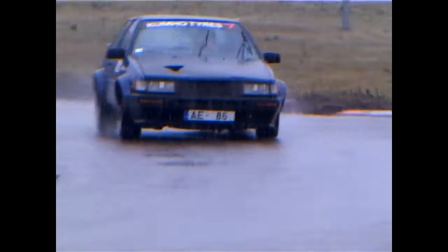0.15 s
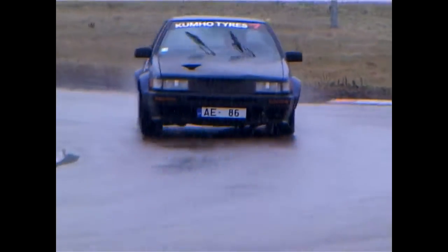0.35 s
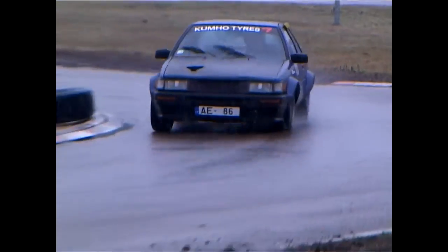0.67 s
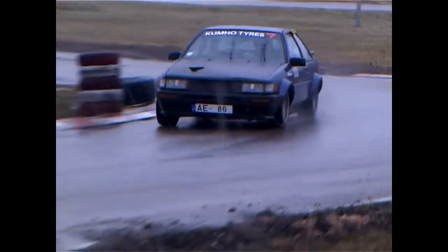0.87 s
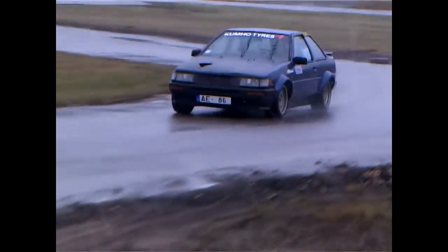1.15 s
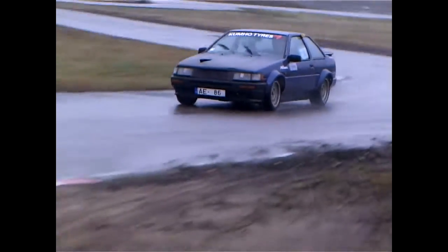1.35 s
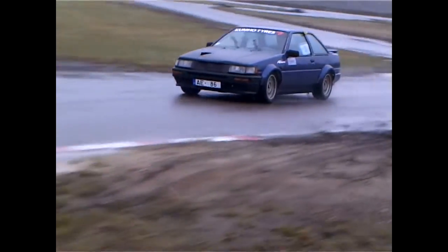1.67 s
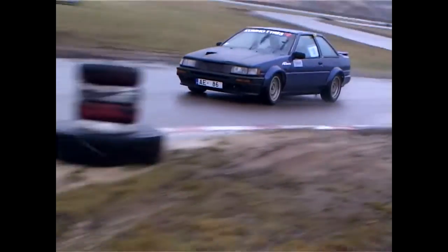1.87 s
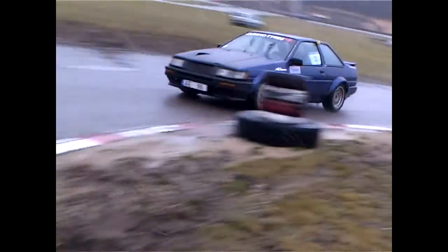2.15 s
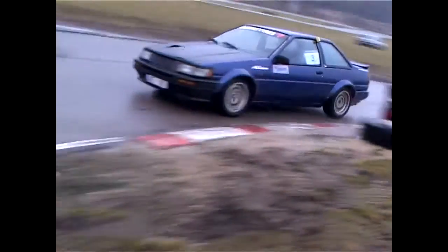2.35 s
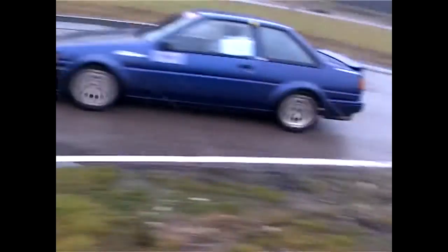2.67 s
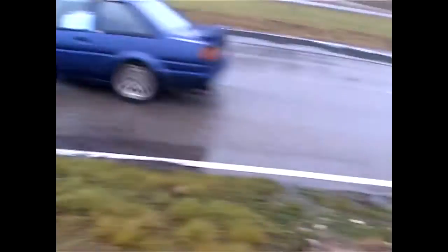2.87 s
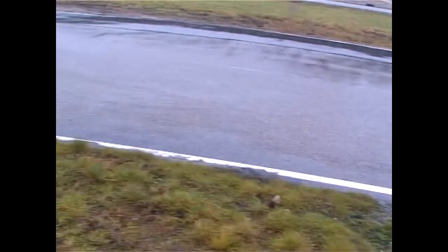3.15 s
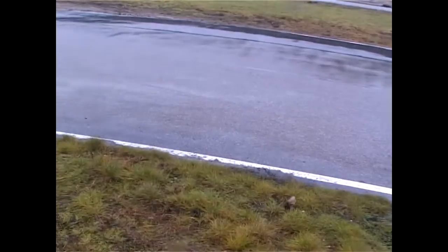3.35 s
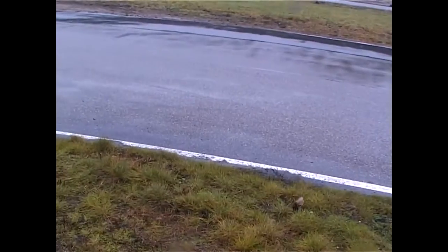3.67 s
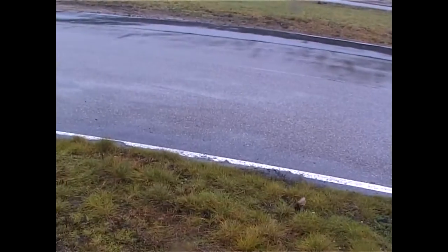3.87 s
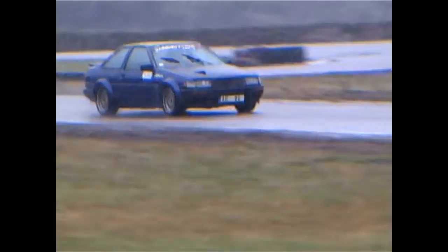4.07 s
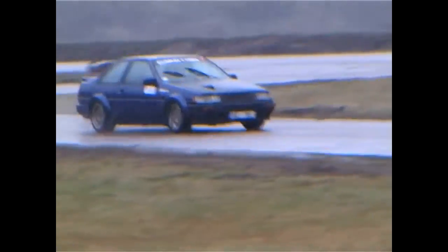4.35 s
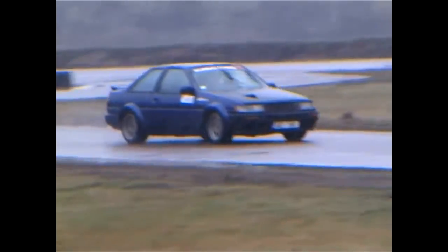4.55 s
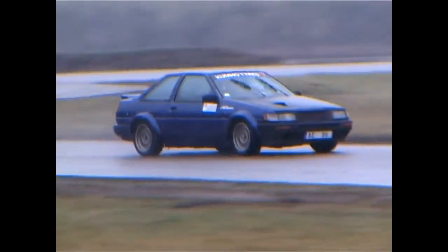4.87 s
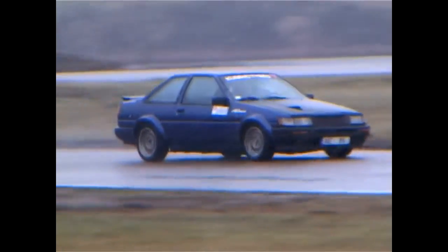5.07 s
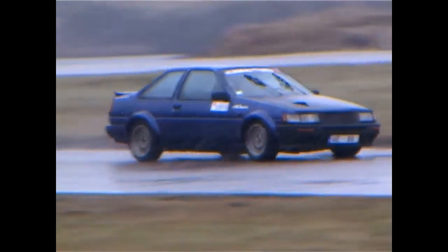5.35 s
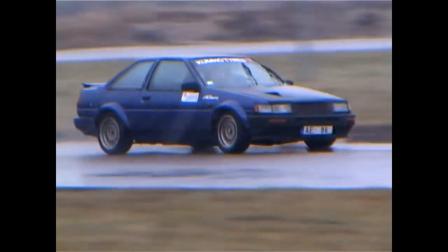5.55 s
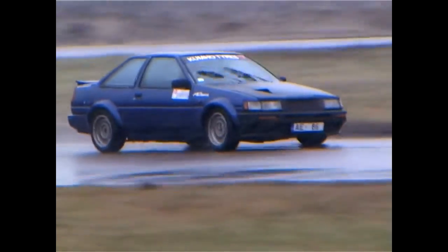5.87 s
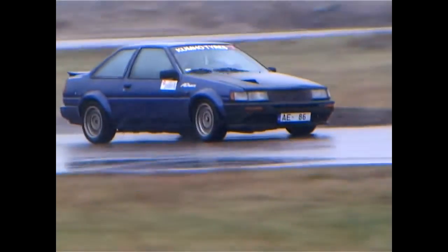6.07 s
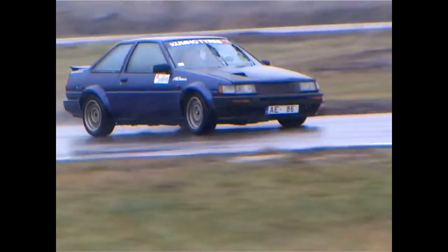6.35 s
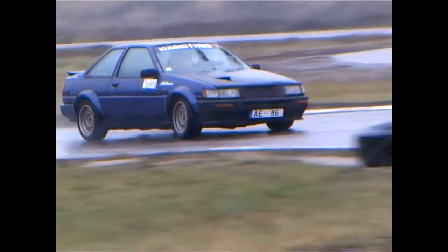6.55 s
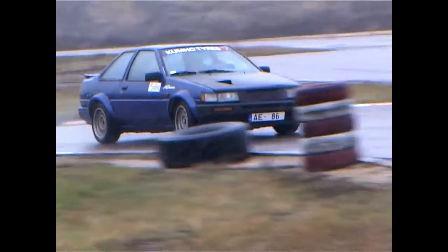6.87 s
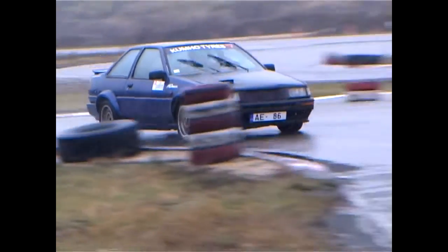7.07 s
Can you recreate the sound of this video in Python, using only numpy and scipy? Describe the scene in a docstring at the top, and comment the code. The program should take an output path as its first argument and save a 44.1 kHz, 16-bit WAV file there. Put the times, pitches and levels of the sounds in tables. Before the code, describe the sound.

Outdoors on a wet track, a car engine holds wavering revs, swelling to a close, barking growl over wide tyre roar and water spray. A brief metallic rattle follows, then the sound cuts out for an instant. It returns with the car more distant, its exhaust popping several times before the revs sag and pick up. Occasional drops land near the microphone, with far engines and a very faint electronic whine underneath.

```python
"""A four-cylinder car slides through two wet corners of a race track, with a short silence between them.
Its exhaust pulses and rushing gas boom, growl and bark. Loose exhaust metal rattles as it leaves the
first corner, and it backfires in the second, farther one. Tyres roar on the wet road and throw spray,
a few drops hit close by, and other engines drone further off. Under it all, the electronics of a
stereo microphone faintly whine and hiss."""
import sys
import numpy as np
from scipy import signal
from scipy.fft import rfft, irfft, next_fast_len
from scipy.io import wavfile
from scipy.ndimage import uniform_filter1d, map_coordinates

SR = 44100
rng = np.random.default_rng(int(sys.argv[2]) if len(sys.argv) > 2 else 0)


def wav_out(sig):
    """Save sig, one row per channel (or a flat mono array), as 16-bit PCM at SR to the path in sys.argv[1]."""
    wavfile.write(sys.argv[1], SR, np.round(np.clip(np.atleast_2d(sig).T, -1, 1) * 32767).astype(np.int16))


N = 317520
TIME = np.arange(N) / SR
SECOND_CORNER_S, SILENCE_START_S, SILENCE_END_S = 4.27, 4.1935, 4.3525

# How alike left and right are in rushing noise: frequency_hz, likeness (1 = the same)
STEREO_LIKENESS = [(30, 0.99), (1000, 0.95), (1500, .8), (2200, 0.96), (3300, 0.36), (5500, 0.96),
                   (8000, 0.37), (16000, .1)]
# How far each side's phase wanders, opposite to the other: frequency_hz, twist_radians
STEREO_TWIST = [(900, 0), (1300, 0), (1900, 0.94), (3300, 0.64), (5500, 0.61), (9000, 0.59)]
# Thin tones of the electronics: pitch_hz, level_db
WHINE_TONES = [(15127, -92), (15375, -90), (15622, -97.5)]
# Tone colour of each noise: frequency_hz, relative_db
HISS_COLOUR = [(6000, -29.5), (10000, 2.5), (16000, -1.5)]  # electronics
RUMBLE_COLOUR = [(15, -29), (30, -20.5), (50, -4.5), (80, 3.5), (130, 8), (200, -1), (350, -13),
                 (600, -55.5)]  # road
NEAR_ROAR_COLOUR = [(500, 1.5), (900, 9), (1250, 7.5), (1550, -4), (1900, 0.5), (2250, 1.5), (2550, -6),
                    (2850, -2.5), (3200, -29.5), (4000, -50)]  # tyres, with a dip from the ground echo
FAR_ROAR_COLOUR = [(500, -26), (900, 7.5), (1250, 4.5), (1600, -0.5), (1900, 0), (2250, 0), (2550, -5.5),
                   (2850, -8.5), (3200, -21.5), (4000, -42)]  # tyres in the second corner, without that dip
SPRAY_COLOUR = [(2500, -14.5), (3200, 2), (3800, 2), (4500, -1), (5200, -2), (5900, 1), (6600, -4),
                (7600, -15), (9000, -33)]  # thrown water
MIST_COLOUR = [(6000, -17), (7400, 0), (8600, -1), (10000, -6.5), (11500, -14), (13000, -23.5),
               (16000, -41)]  # finer water
THUMP_COLOUR = [(180, -26), (300, -5.5), (450, 2), (600, 0.5), (800, 2.5), (950, -8), (1300, -17.5),
                (2500, -41.5)]  # the pipe in a backfire
CRACK_COLOUR = [(300, -23.5), (1000, 3), (3000, -12), (7000, -16.5), (8500, -38), (14000, -52.5)]  # the sharp edge of a backfire
RATTLE_COLOUR = [(3200, -50), (4300, -4), (5200, 6), (6000, 1.5), (7500, 0), (8600, -9), (10000, -9.5),
                 (11500, -17), (14000, -26), (16000, -43.5)]  # loose metal
GROWL_COLOUR = [(130, -53), (185, 4), (300, 2), (440, -4.5), (520, -6), (620, -61)]  # low exhaust gas noise
BARK_COLOUR = [(400, -29), (530, 1.5), (620, 1), (745, 8.5), (860, 4.5), (1050, -7.5), (1250, -8.5),
               (1500, -21.5), (2500, -92)]  # higher exhaust gas noise
# Distant engines, one list each: time_s, firing_rate_hz, level_db
DISTANT_ENGINES = [
    [(0.02, 93.6, -35), (0.14, 87.5, -28), (0.26, 87.2, -40), (0.38, 83, -32.5), (0.5, 82.5, -35),
     (0.62, 91.4, -36), (0.74, 91.5, -33), (0.86, 98.36, -39), (0.98, 98.5, -32), (1.1, 112.8, -38),
     (1.22, 128, -37), (1.34, 135, -37)],
    [(2.06, 146.9, -17), (2.1, 158, -26), (2.14, 163, -18.5), (2.18, 165.8, -18), (2.22, 168.8, -17.5),
     (2.26, 171.9, -28), (2.3, 162.1, -28), (2.34, 167.3, -25)],
    [(4.38, 119.5, -28), (4.53, 116.5, -26.5), (4.68, 113.9, -29), (4.83, 109.3, -29.5),
     (4.98, 105.6, -32.5), (5.13, 104.7, -26), (5.28, 99.74, -32.5), (5.43, 97.95, -31.5),
     (5.58, 95.1, -43), (5.73, 91.4, -33), (5.88, 89.3, -45), (6.03, 87.16, -49), (6.18, 84.44, -27),
     (6.33, 82.26, -38), (6.48, 78.8, -39), (6.63, 76.9, -36), (6.78, 77.2, -37), (6.93, 77.9, -35),
     (7.08, 79.9, -32)],
    [(4.38, 159.1, -41), (4.5, 163.1, -27), (4.62, 164.3, -30), (4.74, 170.9, -43), (4.86, 171.9, -30),
     (4.98, 178.3, -47), (5.1, 179.3, -51), (5.22, 179.4, -34), (5.34, 180.1, -46), (5.46, 180.9, -32),
     (5.58, 186.7, -40), (5.7, 187.6, -36.5), (5.82, 178.8, -27.5), (5.94, 175.3, -29.5),
     (6.06, 154.3, -27.5)],
]
# Their tones: multiple of the firing rate, relative_db
DISTANT_TONES = [(1, -0.5), (1.5, -17.5), (2, -21.5), (3, -21.5)]
# How each wet road noise swells, before its fixed boost: time_s, rumble_db, roar_db, spray_db, mist_db
ROAD_LEVELS = [(0.0, -32, -49, -64.5, -67.5), (0.28, -37.5, -48, -65.5, -70),
               (0.42, -37.5, -48, -65.5, -66.5), (0.53, -39.5, -48.5, -63.5, -67),
               (0.69, -37.5, -47, -61, -65), (0.84, -38, -45, -60, -63), (1.01, -38, -45, -59, -63),
               (1.2, -40, -45, -58, -60.5), (1.32, -40, -43, -58, -60.5), (1.53, -42.5, -44, -61, -61),
               (1.69, -38.5, -44.5, -60, -61.5), (1.96, -37, -41.5, -59.5, -63.5),
               (2.09, -33.5, -40, -58.5, -62.5), (2.28, -34.5, -40, -63, -68.5),
               (2.65, -46, -41.5, -58, -60), (2.89, -42.5, -44.5, -60.5, -61.5),
               (3.01, -41.5, -44, -60.5, -62), (3.2, -45.5, -48, -62, -62), (3.32, -46.5, -52, -66, -64.5),
               (3.5, -43, -54, -67.5, -72.5), (3.6, -41.5, -53, -62, -70), (3.752, -40.5, -53, -65, -71),
               (3.892, -43, -55.5, -64, -74), (4.0, -38, -56.5, -64, -72), (4.55, -40.5, -46.5, -68.5, -73),
               (4.72, -37, -47, -68.5, -73), (4.88, -37.5, -47.5, -69.5, -74),
               (5.12, -35.5, -45.5, -66, -76), (5.2, -35, -46.5, -65.5, -74.5),
               (5.39, -37.5, -45, -69, -76), (5.65, -37.5, -43, -64.5, -72), (5.86, -37.5, -42.5, -64, -69),
               (6.04, -40, -45.5, -64.5, -69), (6.15, -39, -48, -63.5, -68.5),
               (6.32, -36.5, -46, -64, -69.5), (6.5, -33.5, -47.5, -64.5, -71),
               (6.72, -39, -48, -62.5, -67.5), (6.94, -40, -46.5, -64, -68.5),
               (7.17, -33, -47.5, -62.5, -68.5)]
# Drops landing near the microphone: start_s, peak_db, pitch_hz
DROP_HITS = [(.433, -45, 10200), (0.6319, -27.5, 8800), (1.358, -16.5, 2480), (1.358, -44.5, 8330),
             (4.405, -41, 6920), (5.719, -35, 5040), (5.83, -36, 5850), (6.777, -33.5, 6130),
             (6.892, -47.5, 10000)]
# Backfires, with relative levels (a fade is the time to fall by 60 dB):
# start_s, blast_db, rise_s, thump_db, thump_fade_s, ring_db, ring_hz, crack_db
BACKFIRES = [(4.37, -19, .0004, -19, 0.061, -18, 320.3, -31),
             (4.5121, -10.5, 0.00032, -20, .06, -21, 780, -36),
             (4.634, -10.5, 0.0003, -21, 0.067, -18.5, 783.7, -36),
             (5.224, -8.5, .00035, -16.5, .05, -34, 451.2, -14),
             (5.5365, -12, 0.00042, -26, .08, -16, 624, -35)]
# Strength of the exhaust rattle: time_s, relative_db
RATTLE_LEVELS = [(3.5, -78), (3.506, -73), (3.582, -47.5), (3.724, -44.5), (3.726, -49), (3.782, -46),
                 (3.81, -63), (3.83, -60.5), (3.835, -56), (3.845, -48.5), (3.881, -47.5), (3.9, -66),
                 (3.91, -60.5), (3.952, -53), (3.958, -62.5), (4.012, -54), (4.022, -66), (4.064, -54),
                 (4.19, -63.5)]
# The car's engine: time_s, firing_rate_hz, boom_db, growl_db, bark_db, cylinder unevenness (0 to 1)
ENGINE_RUN = [(0.02, 138.7, -31.5, -35, -43, 0.4), (0.12, 136.3, -30, -44, -41.5, 0.4),
              (0.22, 135.9, -29, -37, -46, 0.3), (0.32, 132.1, -25, -41.5, -41, 0.4),
              (0.42, 133.3, -30, -50, -37.5, 0.2), (0.46, 136.2, -29, -31.5, -36, 0.4),
              (0.52, 139.6, -25, -36, -35, 0), (0.62, 136.2, -24.5, -28.5, -34, 0),
              (0.67, 133.8, -23, -29.5, -33.5, 0.4), (0.72, 137.3, -23.5, -26, -29, 0.1),
              (0.82, 142.4, -23, -24.5, -30.5, 0.4), (0.86, 144.4, -19.5, -25, -29.5, 0.3),
              (0.92, 140.2, -22.5, -20, -25, 0), (1.02, 140.5, -22, -21.5, -26.5, 0.3),
              (1.12, 144.1, -23, -19, -26, 0), (1.22, 143.6, -20.5, -18, -23, 0.4),
              (1.32, 146.8, -18, -17.5, -21.5, 0.2), (1.42, 146.8, -18, -19, -24, 0.4),
              (1.52, 148.4, -17.5, -20, -23, 0.4), (1.62, 150.2, -16.5, -21, -24, 0.4),
              (1.72, 150.9, -19, -23, -24.5, 0.4), (1.82, 152.7, -18, -26, -25, 0),
              (1.92, 151.5, -20, -24.5, -25, 0), (1.97, 152.7, -21, -26, -29, 0.4),
              (2.02, 145.7, -19.5, -27.5, -27, 0.4), (2.06, 142.7, -20, -26, -27, 0.4),
              (2.12, 147, -20, -27, -29.5, 0), (2.22, 151.3, -28, -28.5, -31.5, 0.4),
              (2.32, 152.1, -19, -22.5, -26, 0), (2.42, 148.9, -15.5, -23.5, -30.5, 0),
              (2.52, 149.2, -15.5, -25, -28, 0), (2.62, 152.1, -16, -24.5, -25, 0.1),
              (2.72, 150.7, -16.5, -25, -23, 0.4), (2.82, 152.2, -15.5, -22.5, -22.5, 0.2),
              (2.92, 149.2, -15.5, -23, -24.5, 0.1), (3.02, 147.8, -15.5, -24.5, -21, 0.4),
              (3.12, 147.1, -16, -25, -23, 0.4), (3.22, 145, -17.5, -27.5, -22, 0.2),
              (3.32, 146.3, -20.5, -26, -23.5, 0.1), (3.38, 145.1, -18.5, -26, -24.5, 0.3),
              (3.42, 138.8, -25, -39, -36, 0.4), (3.46, 134.7, -25.5, -33, -34, 0.1),
              (3.52, 141.2, -19, -30, -33.5, 0), (3.57, 145.4, -19.5, -31.5, -26.5, 0),
              (3.62, 143.2, -17.5, -31, -28.5, 0.2), (3.67, 140.2, -19.5, -31, -28.5, 0),
              (3.72, 140.6, -18.5, -30.5, -30, 0.1), (3.78, 141, -19.5, -33.5, -28, 0.4),
              (3.82, 141.4, -21, -33.5, -35, 0.4), (3.92, 138.4, -19.5, -32.5, -32, 0.4),
              (4.02, 136.3, -23, -35, -32.5, 0.2), (4.12, 135.8, -20, -32, -34.5, 0.4),
              (4.17, 135.2, -23.5, -35, -34.5, 0.3), (4.38, 141.4, -23, -31.5, -41, 0.4),
              (4.48, 141.5, -32, -29.5, -35, 0), (4.58, 143.9, -26, -31.5, -40.5, 0.4),
              (4.68, 147.5, -29, -33.5, -42, 0.4), (4.78, 148.3, -28.5, -32, -39, 0.4),
              (4.88, 150.2, -28.5, -30, -40.5, 0.3), (4.98, 150.4, -28, -28.5, -37, 0.3),
              (5.08, 155.8, -31.5, -27, -34, 0.1), (5.18, 155.2, -30, -27, -38, 0),
              (5.22, 156.5, -28, -24, -33, 0.3), (5.25, 157, -34, -41, -43, 0),
              (5.38, 155.4, -31, -36.5, -39.5, 0.3), (5.48, 153, -30, -43.5, -46, 0),
              (5.58, 151.8, -27, -33, -33.5, 0.4), (5.68, 150.6, -25.5, -39.5, -39, 0.4),
              (5.78, 149, -26, -38, -34.5, 0.4), (5.88, 147.2, -28.5, -32.5, -38, 0.4),
              (5.98, 142.4, -38, -36.5, -37.5, 0.4), (6.08, 132, -26, -35, -36, 0.4),
              (6.18, 123.6, -28.5, -36.5, -41.5, 0.2), (6.28, 132.8, -21.5, -36, -41, 0),
              (6.38, 130.5, -25, -36, -42, 0.4), (6.48, 132.7, -19.5, -38, -39, 0.4),
              (6.58, 134.1, -23, -36, -42, 0.3), (6.68, 133.8, -29, -41, -41, 0.3),
              (6.78, 135.8, -22.5, -33.5, -41.5, 0), (6.88, 136.2, -22.5, -37, -42, 0.2),
              (6.98, 139.3, -19, -36, -38.5, 0.4), (7.08, 135.9, -29, -33.5, -40.5, 0),
              (7.18, 139.8, -25, -32, -39.5, 0.3)]
# Gas noise in the exhaust note, high off the throttle and far away: time_s, share (0 to 1)
GAS_SHARE = [(0, .8), (.42, .8), (.55, .45), (1, .3), (1.9, .3), (2.02, .75), (2.3, .6), (2.6, .4),
             (2.8, .25), (3.35, .2), (3.45, .65), (3.56, .25), (3.78, .25), (3.86, .65), (4.4, .7),
             (4.75, .45), (5.2, .4), (5.28, .9), (6, .9), (6.5, .7), (7.2, .55)]
# Which end of the car faces us: time_s, facing (0 = nose, 1 = tail)
CAR_FACING = [(0, 0.18), (1.9, 0.19), (2.5, 0.89), (2.8, 1), (4.2, 0.77), (4.35, 0.23), (5.2, 0.023),
              (6.2, 1), (7.2, 0.72)]
# Exhaust tones from each side: multiple of the crankshaft speed, relative_db
NOSE_TONES = [(0.5, -32), (1, -34), (1.5, -21.5), (2, 0), (2.5, -14), (3, -7), (3.5, -12), (4, -6),
              (4.5, -21), (5, -22.5), (5.5, -27.5), (6, -8.5), (6.5, -26.5), (7, -22.5), (7.5, -12),
              (8, -8.5), (8.5, -19), (9, -10.5), (9.5, -12), (10, -9.5), (10.5, -23.5), (11, -15),
              (11.5, -29.5), (12, -12), (12.5, -28), (13, -17.5), (13.5, -28), (14, -15), (14.5, -25),
              (15, -18.5), (15.5, -32), (16, -41)]
FAR_NOSE_TONES = [(0.5, -32), (1, -24), (1.5, -8), (2, 0), (2.5, -21), (3, -5.5), (3.5, -5), (4, -4.5),
                  (4.5, -12.5), (5, -26), (5.5, -20), (6, -17), (6.5, -23), (7, -22.5), (7.5, -20),
                  (8, -14), (8.5, -10.5), (9, -13), (9.5, -17), (10, -9.5), (10.5, -27), (11, -19),
                  (11.5, -24), (12, -17), (12.5, -34), (13, -34), (13.5, -26), (14, -30), (14.5, -23),
                  (15, -38), (15.5, -39), (16, -44)]  # in the second corner
TAIL_TONES = [(0.5, -35), (1, -26), (1.5, -27), (2, 0), (2.5, -17.5), (3, -12.5), (3.5, -33.5), (4, -10),
              (4.5, -38), (5, -21.5), (5.5, -36), (6, -14.5), (6.5, -38.5), (7, -26.5), (7.5, -34.5),
              (8, -15), (8.5, -22.5), (9, -14.5), (9.5, -34), (10, -8), (10.5, -21), (11, -12), (11.5, -38),
              (12, -15), (12.5, -23.5), (13, -17), (13.5, -36), (14, -24), (14.5, -28.5), (15, -32.5),
              (15.5, -41.5), (16, -31)]


def amp(db):
    """Turn decibels into a gain."""
    return 10 ** (np.asarray(db) / 20)


def unit(x):
    """Scale to an average (rms) level of 1."""
    return x / np.sqrt(np.mean(x ** 2) + 1e-20)


def along(points, hz):
    """Read between a table's rows on a log frequency scale."""
    frequencies, values = np.transpose(points)
    return np.interp(np.log(hz + 1), np.log(frequencies + 1), values)


def curves(rows):
    """One value per sample for each column after the time."""
    times, *columns = np.transpose(rows)
    return [np.interp(TIME, times, column) for column in columns]


def wobble(rate_hz):
    """A smooth curve through rate_hz random points a second."""
    coarse = TIME[::32]
    points = rng.standard_normal(int(N * rate_hz / SR) + 4)
    return np.interp(TIME, coarse, map_coordinates(points, [coarse * rate_hz]))


def filtered(x, response):
    """Multiply each frequency in x by response(hz)."""
    size = next_fast_len(N + SR // 2)
    return irfft(rfft(x, size) * response(np.fft.rfftfreq(size, 1 / SR)), size)[..., :N]


def coloured(x, colour):
    """Give x a tone colour, at an average level of 1."""
    return unit(filtered(x, lambda hz: amp(along(colour, hz))))


def rush(colour, patchy_db, stripes_db=1.47):
    """Patchy stereo noise; echoes off the wet ground shift the phase between left and right."""
    hz, _, noise = signal.stft(rng.standard_normal((2, N)), SR, nperseg=512)

    def patches(bands, frames):
        field = rng.standard_normal(noise.shape[1:])
        return unit(uniform_filter1d(uniform_filter1d(field, bands, 0), frames, 1))

    noise = noise * amp(patchy_db * patches(6, 10) + stripes_db * patches(3, 150))  # quick, and lasting
    spread = np.arccos(np.clip(along(STEREO_LIKENESS, hz), -1, 1))[:, None] / 2
    twist = np.exp(1j * along(STEREO_TWIST, hz)[:, None] * patches(4, 90))
    middle, side = np.cos(spread) * noise[0], np.sin(spread) * noise[1]
    pair = np.array([middle * twist + side, middle / twist - side])
    return coloured(signal.istft(pair, nperseg=512)[1][:, :N], colour)


def electronics():
    """The microphone's circuits add a faint, high whine and hiss."""
    whine = sum(amp(db) * np.sqrt(2) * np.sin(2 * np.pi * hz * TIME) for hz, db in WHINE_TONES)
    return whine + amp(-83) * coloured(rng.standard_normal((2, N)), HISS_COLOUR)


def distant_engines():
    """Each engine's firing makes a wavering note with weak overtones, fading in and out."""
    out = np.zeros(N)
    for rows in DISTANT_ENGINES:
        hz, db = curves(rows)
        fade = np.clip(np.minimum(TIME - rows[0][0], rows[-1][0] - TIME) / 0.083 + 1, 0, 1)
        phase = 2 * np.pi * np.cumsum(hz) / SR + 0.39 * wobble(4.8)
        note = sum(amp(tone_db + 1.4 * wobble(23)) * np.sin(k * phase) for k, tone_db in DISTANT_TONES)
        out += fade * amp(db) * np.sqrt(2) * note
    return out


def wet_road():
    """Tyres rumble, roar and throw up spray and mist; the last three partly swell together."""
    rumble_db, roar_db, spray_db, mist_db = curves(ROAD_LEVELS)
    swell = wobble(9.9)
    rumble = amp(rumble_db + 3.5 + 1.1 * wobble(10)) * rush(RUMBLE_COLOUR, patchy_db=0.5)
    roar_gain = amp(roar_db + 8.5 + .75 * swell + 0.32 * wobble(60))
    near, far = rush(NEAR_ROAR_COLOUR, patchy_db=0.14), rush(FAR_ROAR_COLOUR, patchy_db=1.0)
    roar = roar_gain * np.where(TIME < SECOND_CORNER_S, near, far)
    spray = amp(spray_db + 8.5 + .8 * swell + wobble(90)) * rush(SPRAY_COLOUR, patchy_db=1.24)
    mist = amp(mist_db + 3 + 0.83 * swell + 1.1 * wobble(40)) * rush(MIST_COLOUR, patchy_db=2.5)
    return rumble + roar + spray + mist


def drops(fade_s=0.0053):
    """Each drop lands with a tiny tick, not quite the same on the left and right."""
    out, t = np.zeros((2, N + SR)), TIME[:SR // 100]
    for start_s, db, hz in DROP_HITS:
        scatter = np.cumsum(0.21 * rng.standard_normal((2, len(t))), axis=1)
        tick = amp(db - 60 * t / fade_s) * np.sin(2 * np.pi * hz * t + scatter)
        out[:, round(start_s * SR):][:, :len(t)] += tick
    return out[:, :N]


def backfires(echo_s=0.0068):
    """Each pop is a blast and a ring of the pipe, echoed by the wet ground, plus a thump and a crack."""
    out, thump_gain, crack_gain = np.zeros((3, N + SR))
    t = TIME[:SR // 6]
    for start_s, blast_db, rise_s, thump_db, fade_s, ring_db, ring_hz, crack_db in BACKFIRES:
        here = slice(round(start_s * SR), round(start_s * SR) + len(t))
        age = t / rise_s
        onset = 1 - np.exp(-age)
        push_pull = np.sin(age) * np.exp(-age / 3.9) * (1 - np.exp(-2 * age))
        blast = 1.33 * amp(blast_db) * push_pull
        ring = amp(ring_db - 60 * t / 0.038) * np.sin(2 * np.pi * ring_hz * t) * onset
        out[here] += blast + ring + 0.41 * np.roll(blast + ring, round(echo_s * SR))
        thump_gain[here] += amp(thump_db - 60 * t / fade_s) * onset
        crack_gain[here] += amp(crack_db) * (amp(-60 * t / 0.0091) + 0.12 * amp(-60 * t / .08)) * onset
    thumps = thump_gain[:N] * coloured(rng.standard_normal(N), THUMP_COLOUR)
    cracks = crack_gain[:N] * rush(CRACK_COLOUR, patchy_db=-1.5)
    return filtered(out[:N] + thumps + cracks, lambda hz: (1 + 1j * hz / 7000) ** -3)  # distance dulls


def rattle(turns, lag_turns=0.055):
    """Loose metal buzzes at every firing, hardest once per crankshaft turn, over a sizzle."""
    firings = np.arange(2, int(2 * turns[-1]))
    at = np.interp(firings / 2 + lag_turns, turns, np.arange(N)).astype(int)
    strength = np.where(firings % 2, .2, 1) * amp(2 * rng.standard_normal(len(firings)))
    knocks = np.bincount(at, strength, N)
    age = TIME[:SR // 50] / 0.00095
    bursts = unit(signal.fftconvolve(knocks, age * np.exp(-age))[:N]) + .15
    metal = coloured(bursts * rush([(1000, 0)], patchy_db=1), RATTLE_COLOUR)
    heard = (TIME > RATTLE_LEVELS[0][0]) & (TIME < RATTLE_LEVELS[-1][0])
    return heard * amp(curves(RATTLE_LEVELS)[0] + 3.0) * metal


def exhaust_tones(turns, uneven, lag_turns=0.268, smear_radians=.03, waver_radians=.3):
    """The sharp part of each pulse trails the boom and makes a low and a high group of tones."""
    facing = curves(CAR_FACING)[0]
    low, high = np.zeros((2, N))
    for (multiple, near_db), (_, tail_db), (_, far_db) in zip(NOSE_TONES, TAIL_TONES, FAR_NOSE_TONES):
        nose_db = np.where(TIME < SECOND_CORNER_S, near_db, far_db)
        gain = amp(nose_db + facing * (tail_db - nose_db) + 1.68 * wobble(7))
        if multiple % 1:  # in-between tones come from unequal cylinders
            gain = gain * uneven / uneven.mean()
            shift = rng.uniform(0, 2 * np.pi)
        else:  # every second pulse is late, which shifts odd multiples a quarter cycle
            shift = np.pi / 2 * (multiple % 2)
        if multiple == 2:  # the boom supplies this tone
            continue
        phase = 2 * np.pi * (turns - lag_turns) - smear_radians * multiple  # the pipe spreads each pulse
        blur = waver_radians * (3 - 2 * facing) * wobble(4)  # stronger when heard past the car's body
        group = low if multiple < 6.8 else high
        group -= gain * np.cos(multiple * phase + shift + blur)
    return low, high


def exhaust_note(tones, gas):
    """Even out the level of the tones, then blend in the noise of rushing gas."""
    share = curves(GAS_SHARE)[0]
    level = np.sqrt(np.abs(uniform_filter1d(tones ** 2, size=SR // 4)) + 1e-12)
    return np.sqrt(1 - share ** 2) * tones / level + share * gas


def car():
    """The firing cylinders boom, their overtones and gas growl and bark, and loose metal rattles."""
    firing_hz, boom_db, growl_db, bark_db, uneven = curves(ENGINE_RUN)
    turns = np.cumsum(firing_hz) / SR / 2  # two firings per crankshaft turn
    firing_phase = 4 * np.pi * turns
    low, high = exhaust_tones(turns, uneven)
    puffs = (1 + .5 * np.cos(firing_phase)) * rng.standard_normal((2, N))
    growl = exhaust_note(low, coloured(puffs[0], GROWL_COLOUR))
    bark = exhaust_note(high, coloured(puffs[1], BARK_COLOUR))
    boom = np.sqrt(2) * amp(0.31 * wobble(15)) * np.sin(firing_phase + .08 * wobble(25))
    snarl = amp(growl_db) * growl + amp(bark_db) * bark
    echo = amp(-25.5) * np.roll(snarl, round(0.0029 * SR))
    side = amp(-33) * snarl + echo  # a little stronger on the left
    return amp(boom_db) * boom + snarl + [side, -side] + rattle(turns)


def scene():
    """Engines sit in the middle; the road spreads wide."""
    return electronics() + car() + distant_engines() + wet_road() + backfires() + drops()


def record(dry):
    """Shift the wave slightly off zero, mute it between the corners and cut the highest treble."""
    outside_silence_s = np.maximum(SILENCE_START_S - TIME, TIME - SILENCE_END_S)
    gate = np.clip(outside_silence_s / .001 + .5, 0, 1)
    return filtered(gate * (dry - .0015), lambda hz: hz < 15800)


dry = scene()
out = record(dry)
wav_out(out)
```